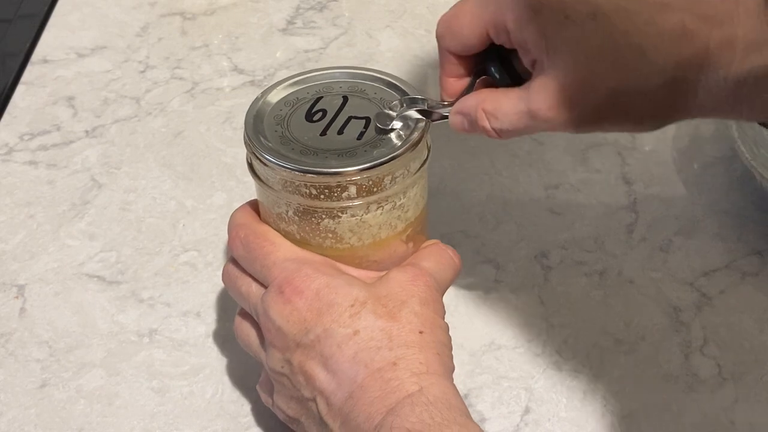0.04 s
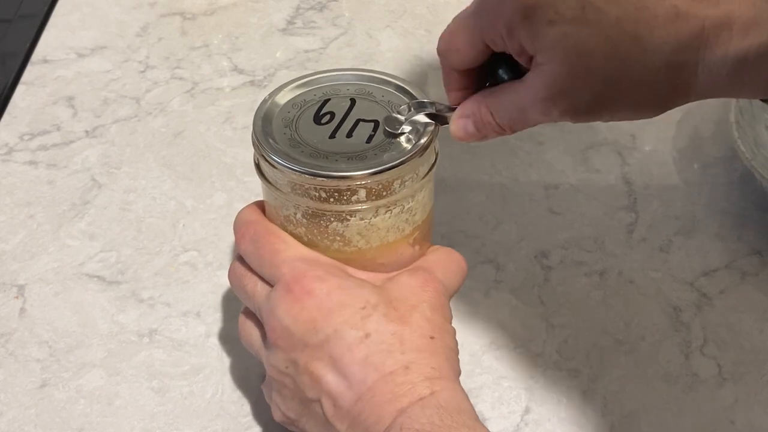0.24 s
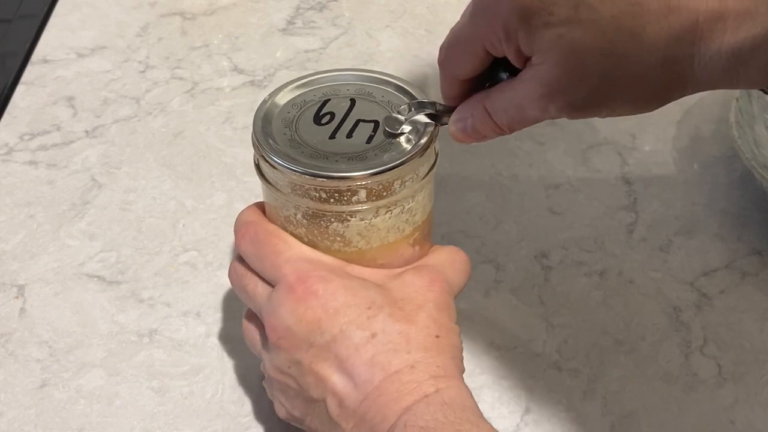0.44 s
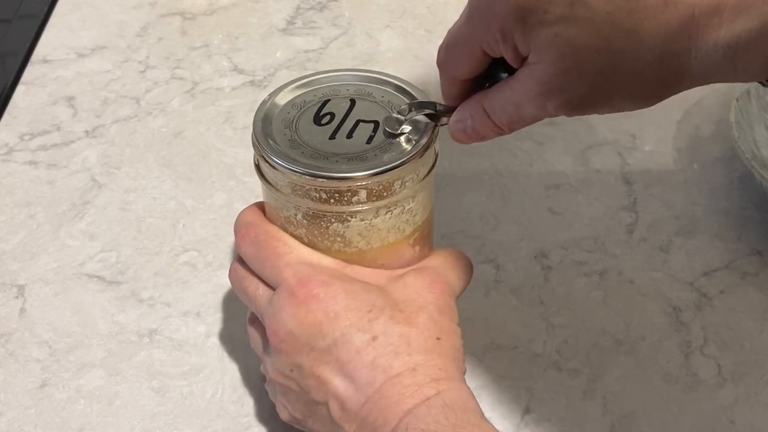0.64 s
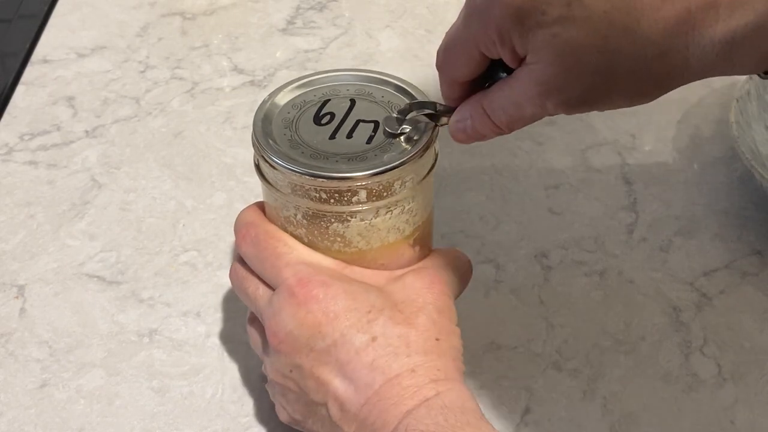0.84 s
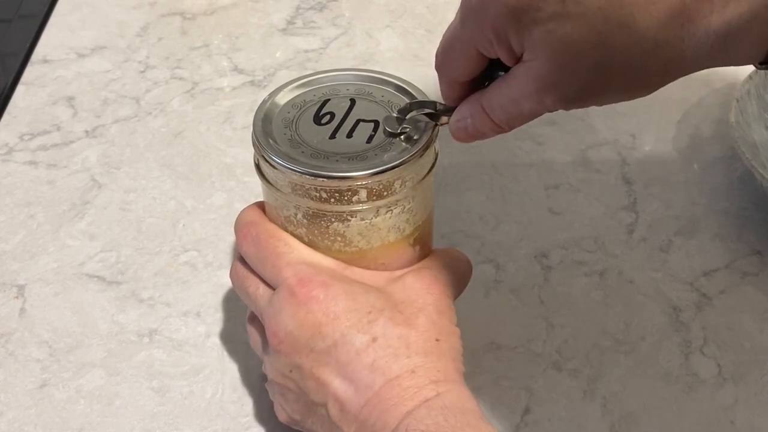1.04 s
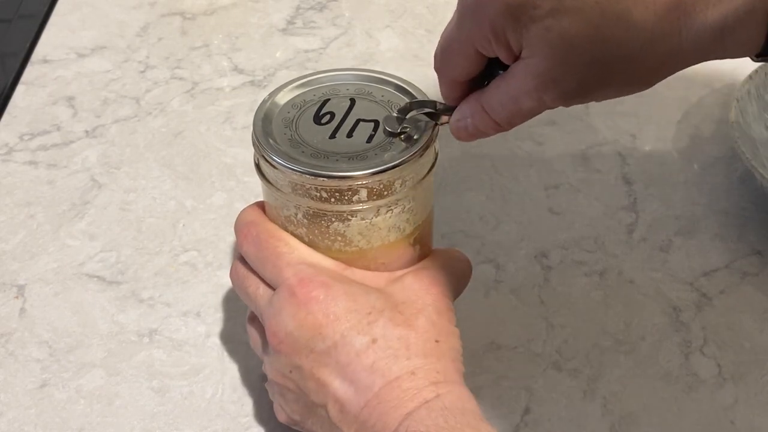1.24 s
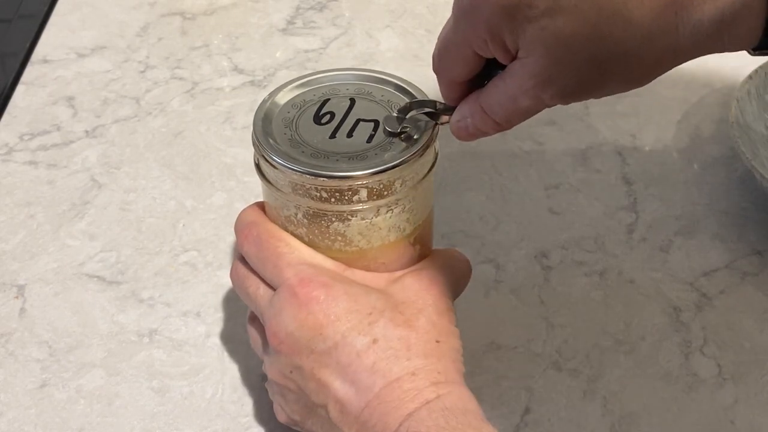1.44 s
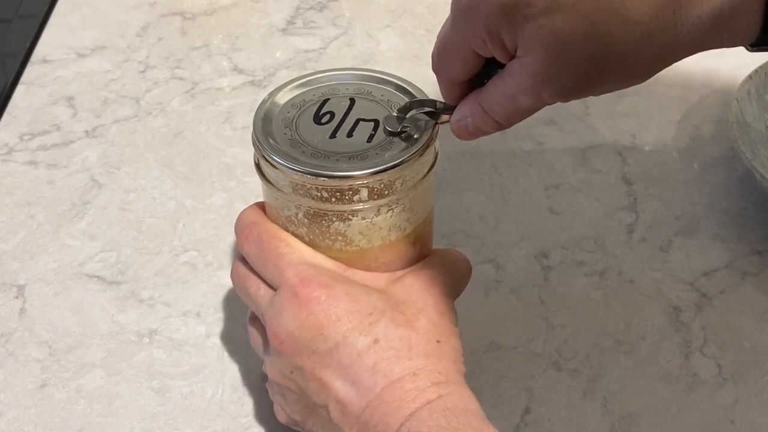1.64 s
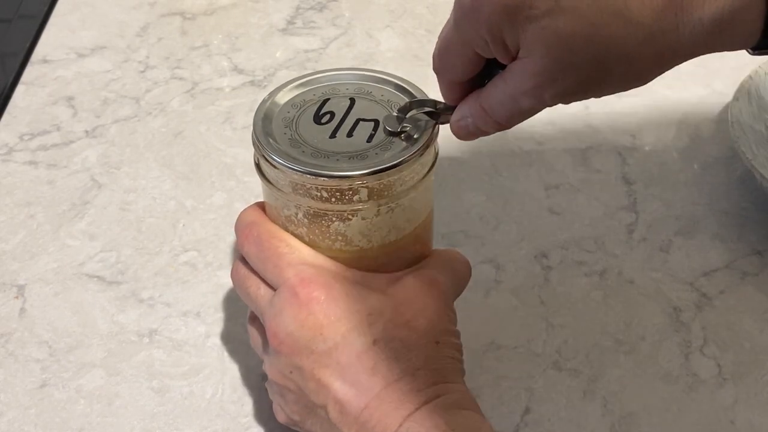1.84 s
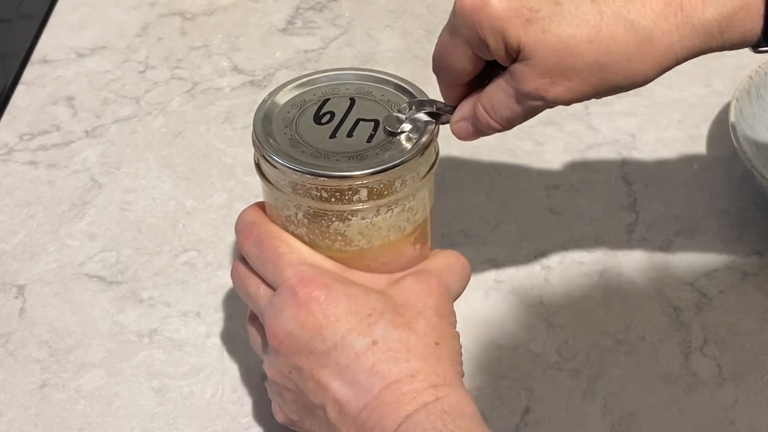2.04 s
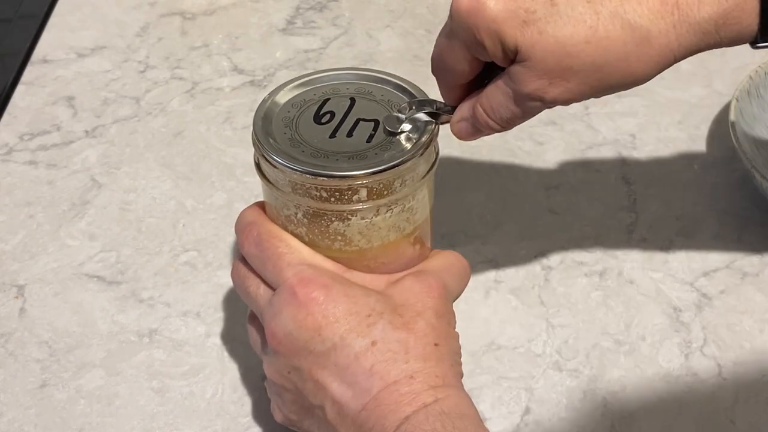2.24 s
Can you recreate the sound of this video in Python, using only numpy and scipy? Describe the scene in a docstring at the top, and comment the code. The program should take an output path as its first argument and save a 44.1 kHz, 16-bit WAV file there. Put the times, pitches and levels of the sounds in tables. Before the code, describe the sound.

One loud, hollow pop rings briefly as a metal opener breaks the seal of a glass jar. Small metallic clicks, scrapes and soft knocks of the jar follow, heard up close on a kitchen counter over a low room rumble.

```python
"""On a kitchen counter, close to the microphones, a metal opener levers the sealed lid off a glass jar.
The seal lets go with one hollow pop that rings the lid, jar and room and overloads the recorder.
The opener ticks and rubs on the loosened lid, and the jar shifts in the hand.
A faint hiss swells just before the pop and twice after it. A low room rumble lies under it all."""
import sys
import numpy as np
from scipy import signal
from scipy.fft import rfft, irfft
from scipy.io import wavfile

SR = 44100
rng = np.random.default_rng(int(sys.argv[2]) if len(sys.argv) > 2 else 0)


def store_wav(level_fs):
    """Save 16-bit WAV to argv[1]."""
    pcm = np.round(np.clip(np.atleast_2d(level_fs), -1, 1) * 32767)
    wavfile.write(sys.argv[1], SR, pcm.T.astype(np.int16))


N = 101429
T = np.arange(N) / SR
HZ = np.maximum(np.fft.rfftfreq(N, 1 / SR), 1)
LEFT_RIGHT = np.array([[1], [-1]])  # adds a "side" signal on the left, subtracts it on the right


def amp(db):
    """Turn decibels into a gain."""
    return 10 ** (np.asarray(db) / 20)


def unit(x):
    """Scale to an average (rms) level of 1."""
    return x / np.sqrt(np.mean(x ** 2))


def colour(x, points):
    """Filter by a tone curve of (pitch_hz, level_db) points."""
    hz, db = np.array(points).T
    curve_db = np.interp(np.log(HZ), np.log(hz), db)
    return irfft(rfft(x) * amp(curve_db), N)


def noise(points):
    """Noise shaped by a tone curve, at an rms level of 1."""
    return unit(colour(rng.standard_normal(N), points))


def fade(start, fade_s):
    """Start suddenly, then fall by 60 dB every fade_s seconds."""
    return (T >= start) * np.exp(-np.log(1000) * np.maximum(T - start, 0) / fade_s)


def rise(start, length_s):
    """A smooth step from 0 to 1."""
    return np.sin(np.pi / 2 * np.clip((T - start) / length_s, 0, 1)) ** 2


def swell(start, length_s):
    """A smooth rise and fall."""
    return np.sin(np.pi * np.clip((T - start) / length_s, 0, 1))


def ring(tones, start=0):
    """The fading tones of an object struck once."""
    return sum(amp(db) * fade(start, fade_s) * np.sin(2 * np.pi * hz * (T - start))
               for hz, db, fade_s in tones)


def convolve(x, response):
    """Pass a sound through an object or room, given its response to one tap."""
    return signal.fftconvolve(x, response)[:N]


def room_rumble():
    """A low, slightly wavering rumble with a few faint hums in it."""
    # tone of the rumble: pitch_hz, level_db
    rumble_curve = [(15, -14), (28, -17), (54, 0.5), (100, -3), (133, -8.5), (165, -2.5), (220, -4.5),
                    (275, -7), (355, -6), (520, -14.5), (700, -20), (1000, -24), (1700, -24), (2100, -28),
                    (2800, -30.5), (3200, -36.5), (4300, -36.5), (5500, -47.5), (7200, -50), (8800, -69),
                    (10500, -56.5), (13000, -54), (15000, -83)]
    # strength of the side signal against the middle: pitch_hz, side_db
    side_curve = [(50, -17), (250, -12), (600, -2.5), (2000, -5), (5000, -26), (9000, 17.5), (14000, -30)]
    # narrow bands where the noise hums: pitch_hz, width_hz, level_db
    hums = [(60, 44, -51), (226.3, 34, -51.5), (2127, 170, -63.5), (5070, 200, -79)]
    rumble_db, waver_db = -42.5, 1.04
    middle = amp(rumble_db) * noise(rumble_curve)
    side = colour(amp(rumble_db) * noise(rumble_curve), side_curve)
    for hz, width, db in hums:
        band = rfft(rng.standard_normal(N)) / (1 + (2 * (HZ - hz) / width) ** 2)
        middle += amp(db) * unit(irfft(band, N))
    waver = noise([(1, 0), (8, 0), (30, -40), (100, -120)])  # mostly below 8 Hz
    return (middle + side * LEFT_RIGHT) * amp(waver_db * waver)


def opener_ticks():
    """Each slip of the opener clicks and briefly rings its tip and the lid."""
    # slips on the rim: start_s, lid_db, tip_db, click_db, edge_db
    slips = [(0.0964, -74, -66, -67.5, -71), (0.4977, -50.5, -66, -67, -64), (0.6444, -47, -60, -63, -64),
             (0.6671, -34, -32, -52, -57), (0.9219, -32.5, -35, -49.5, -72), (1.1640, -46, -46, -60, -64),
             (1.2965, -33.5, -38, -49, -48.5), (2.2228, -26, -33, -37, -56.5)]
    # the lid, damped by the opener, and the steel tip: pitch_hz, level_db, fade_s
    lid_tones = [(560, -18, .03), (804, -14.5, 0.069), (1174, -14.5, 0.033), (2193, -2, 0.038),
                 (2885, -14, 0.058), (3290, -8.5, 0.005)]
    tip_tones = [(3560, -1, 0.0099), (4090, -4, 0.01)]
    # tone of the steel's click and of its bright edge: pitch_hz, level_db
    click_curve = [(300, -16), (1400, -19.5), (2100, -10.5), (2800, 12), (3700, -1), (4800, -15.5),
                   (6000, -15.5), (7300, -7.5), (9000, -41), (15000, -48)]
    edge_curve = [(2000, -15), (5000, -36), (7000, -3.5), (8800, -34), (10300, 11), (12500, 0.5),
                  (14500, -7.5)]
    click_noise, edge_noise = noise(click_curve), noise(edge_curve)
    ticks = 0
    for start, lid_db, tip_db, click_db, edge_db in slips:
        metal = amp(lid_db) * ring(lid_tones, start) + amp(tip_db) * ring(tip_tones, start)
        click = amp(click_db) * click_noise * fade(start, fade_s=0.036)
        edge = amp(edge_db) * edge_noise * fade(start, fade_s=0.021)
        ticks += rise(start, length_s=0.0011) * (metal + click + edge)
    return ticks


def faint_hiss():
    """A faint, thin hiss swells just before the pop and twice after it."""
    # each hiss: start_s, length_s, level_db
    hisses = [(0.114, 0.077, -66), (0.62, 0.046, -67.5), (1.81, 0.44, -71.5)]
    # tone of the hiss: pitch_hz, level_db
    hiss_curve = [(2000, -42), (4000, -2), (7000, -7.5), (9000, -23.5), (12500, -3.5), (15000, -10)]
    return noise(hiss_curve) * sum(amp(db) * swell(start, length) for start, length, db in hisses)


def lid_pop():
    """The lid buckles in three quick pushes; the seal cracks, the glass rings and air rushes in."""
    # the lid gives, snaps up and rebounds: start_s, level_db, contact_ms
    snaps = [(0.1998, -6, 0.22), (0.2021, 1.5, 0.19), (0.2055, -1, 0.76)]
    # the lid and the air under it: pitch_hz, level_db, fade_s
    lid_tones = [(180.8, -22, 0.48), (225.2, -23.5, 0.48), (339, -26, 0.077), (386, -31, 0.31),
                 (444, -21, 0.14), (517, -20, 0.13), (588, -9, 0.048), (807, -8, .04), (900, -17.5, .05),
                 (1121, -4, 0.034), (1183, -5, 0.071), (1497, -17, 0.03), (1790, -18.5, 0.076),
                 (2117, -14.5, 0.2), (2250, -41, 0.096), (2752, -27.5, 0.11)]
    # the glass, set ringing by the crack: pitch_hz, level_db, fade_s
    glass_tones = [(3310, -43, 0.18), (4490, -51.5, 0.18), (4650, -57, 0.33), (8050, -65, .1),
                   (12050, -64, .15)]
    # tone of the cracking seal, and of the gulp of air that shakes lid and opener: pitch_hz, level_db
    crack_curve = [(200, -1), (1200, 2), (2600, -14), (4200, -9), (5300, -20.5), (6600, -21), (9000, -42),
                   (12000, -24), (15000, -42)]
    gulp_curve = [(60, -44), (160, -18), (330, -3), (600, -1), (950, 2.5), (1250, -1), (1600, -4.5),
                  (2400, -13.5), (3300, -25.5), (4500, -41), (8000, -52.5), (15000, -85)]
    crack_s, crack_db = 0.2018, -13.5
    gulp_s, gulp_db = 0.2025, -8
    force = 0
    for start, db, contact_ms in snaps:
        push = np.exp(-2 * ((T - start) * 1000 / contact_ms) ** 2)
        force += amp(db) * push / push.sum()
    # a small lid gives off little sound below 184 Hz
    bass_cut = signal.butter(2, 184, "high", fs=SR, output="sos")
    lid = signal.sosfilt(bass_cut, convolve(force, ring(lid_tones)))
    crack = noise(crack_curve) * fade(crack_s, fade_s=0.0083) * rise(crack_s, length_s=0.00035)
    gulp = noise(gulp_curve) * fade(gulp_s, fade_s=0.092) * rise(gulp_s, length_s=0.0043)
    return lid + amp(crack_db) * crack + amp(gulp_db) * gulp + ring(glass_tones, crack_s)


def jar_bumps():
    """The jar shifts under the hand with soft, low knocks."""
    # each bump: start_s, level_db
    bumps = [(0.522, -47.5), (0.645, -46), (1.482, -40.5), (2.228, -45)]
    # the bumped jar: pitch_hz, level_db, fade_s
    jar_tones = [(198, -2, 0.062), (293.5, 6, 0.14), (344, -15, 0.12)]
    return sum(amp(db) * ring(jar_tones, start) for start, db in bumps)


def opener_rubs():
    """The opener sticks and slips along the rim; the many tiny jolts make it ring."""
    # each rub: start_s, length_s, level_db
    rubs = [(0.631, .035, -50), (1.42, 0.049, -43.5)]
    # the rubbed rim: pitch_hz, level_db, fade_s
    rim_tones = [(920, 1, .05), (1245, 6.5, .09), (1450, -2, .04), (1710, 9.5, 0.028)]
    slips_per_s = 570
    slips = (rng.random(N) < slips_per_s / SR) * rng.standard_normal(N)
    grip = sum(amp(db) * swell(start, length) for start, length, db in rubs)
    rim = ring(rim_tones)
    return convolve(unit(slips) * grip, rim / np.linalg.norm(rim))


def kitchen_echo(x):
    """The direct sound, echoes off counter and wall, then a wash that dies away band by band."""
    # the room's wash of echoes: pitch_hz, level_db, fade_s, side_db
    bands = [(101, -1, 0.35, -7), (220, -7, 0.17, -13), (350, -6, .34, -8.5), (600, -13, 0.41, 5),
             (1080, -12, 0.41, -3.5), (2000, -7, 0.35, -3.5), (3130, -6, 0.46, -28), (6540, -4, 0.27, -5),
             (13000, -17.5, 0.12, 6.5)]
    # bounces off nearby surfaces: delay_s, left_gain, right_gain
    echoes = [(.0021, .03, 0.15), (.0072, 0.25, 0.072), (0.0121, .03, 0.13)]
    build_up_s, right_louder_db = 0.0041, 1
    centres = np.log([band[0] for band in bands])
    white = rfft(rng.standard_normal((2, N)))
    response = np.zeros((2, N))
    for share, (_, db, fade_s, side_db) in zip(np.eye(len(bands)), bands):
        middle, side = irfft(white * np.interp(np.log(HZ), centres, share), N)
        decay = fade(0, fade_s) * (1 - np.exp(-(T / build_up_s) ** 2))
        response += amp(db) * decay / np.linalg.norm(decay) * (middle + amp(side_db) * side * LEFT_RIGHT)
    response[:, 0] += amp([-right_louder_db / 2, right_louder_db / 2])  # the direct sound
    for delay, left, right in echoes:
        response[:, int(delay * SR)] += left, right
    return np.array([convolve(x, channel) for channel in response])


def scene():
    """The jar and opener in the kitchen, heard by two close microphones."""
    sounds = opener_ticks() + faint_hiss() + lid_pop() + jar_bumps() + opener_rubs()
    left, right = kitchen_echo(sounds)
    left_delay_ms = 0.028  # the right microphone hears the jar first
    left = irfft(rfft(left) * np.exp(-2j * np.pi * HZ * left_delay_ms / 1000), N)
    return np.array([left, right]) + room_rumble()


def record(dry):
    """The recorder flattens the peaks of the loud pop and cuts the highest treble."""
    boost_db, top_hz = 0.5, 15600
    clipped = np.clip(amp(boost_db) * dry, -1, 1)
    treble_cut = signal.ellip(8, .1, 70, top_hz, fs=SR, output="sos")
    return signal.sosfilt(treble_cut, clipped)


dry = scene()
out = record(dry)
store_wav(out)
```